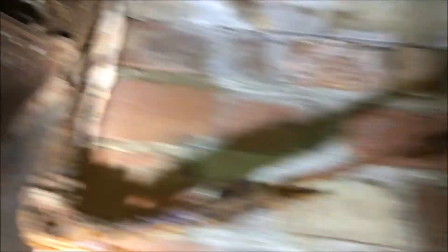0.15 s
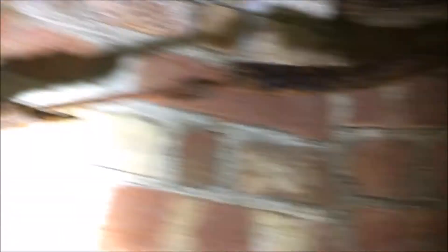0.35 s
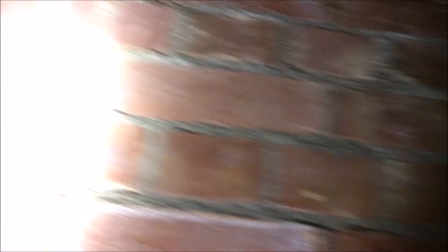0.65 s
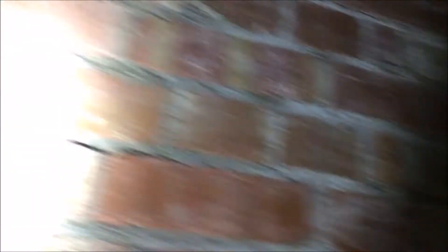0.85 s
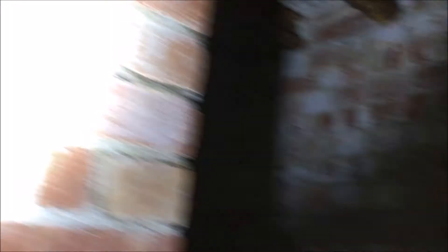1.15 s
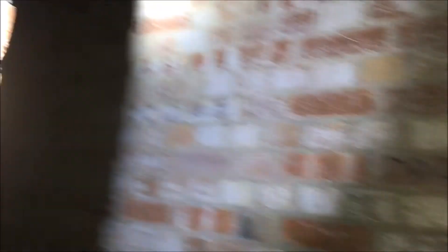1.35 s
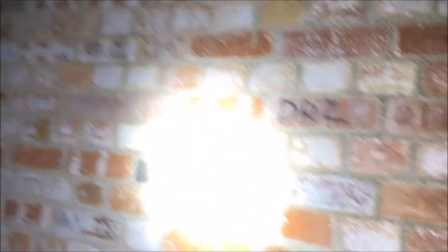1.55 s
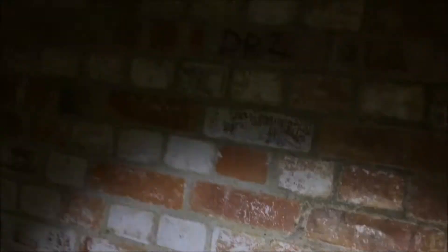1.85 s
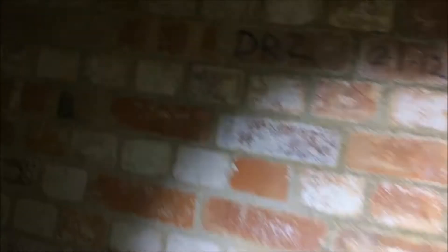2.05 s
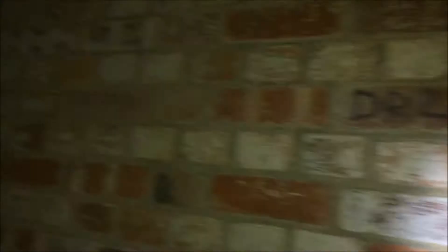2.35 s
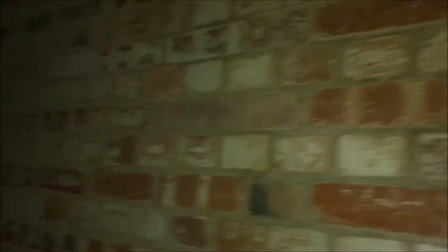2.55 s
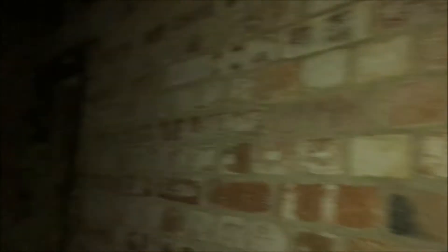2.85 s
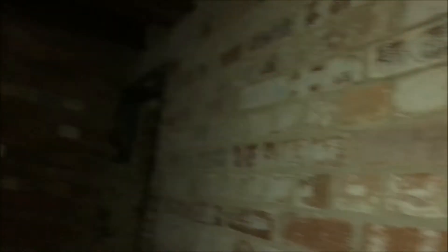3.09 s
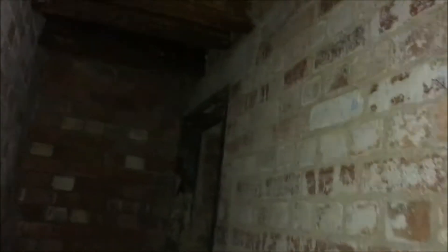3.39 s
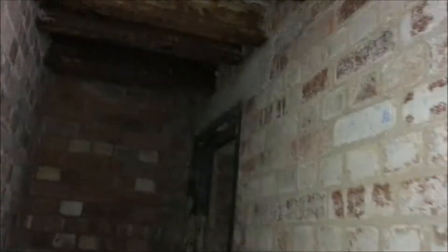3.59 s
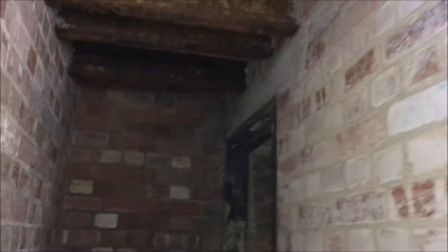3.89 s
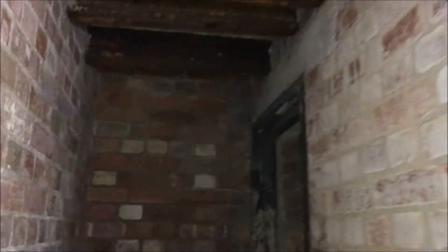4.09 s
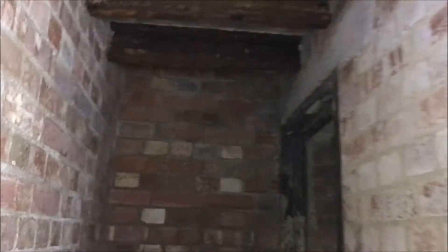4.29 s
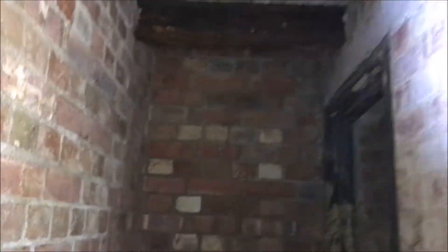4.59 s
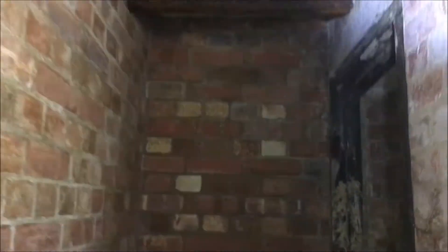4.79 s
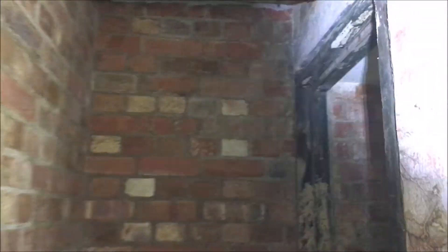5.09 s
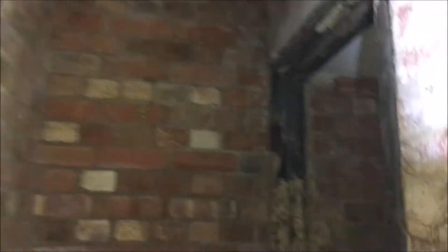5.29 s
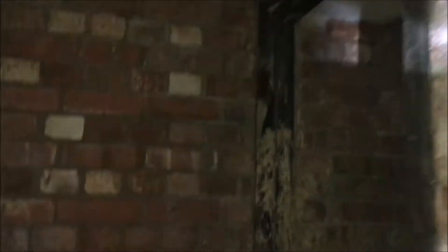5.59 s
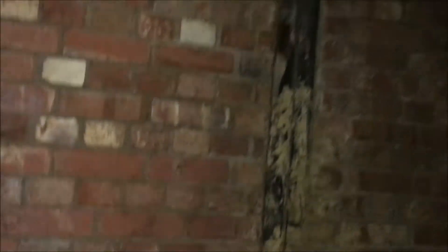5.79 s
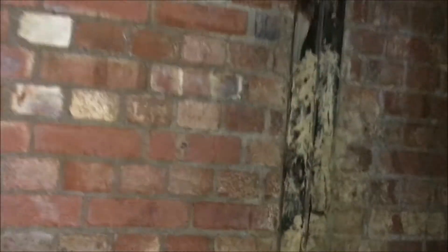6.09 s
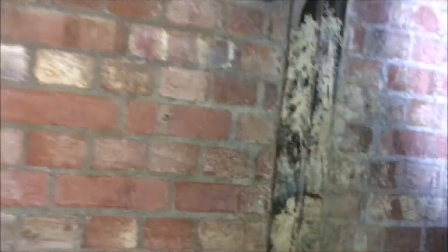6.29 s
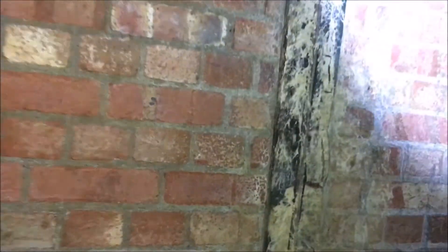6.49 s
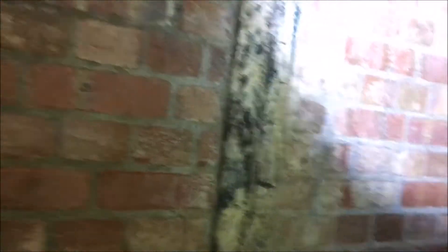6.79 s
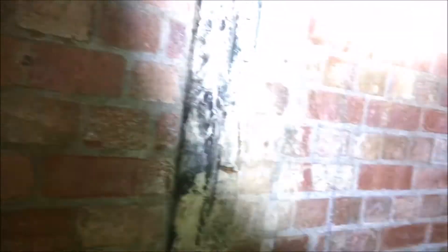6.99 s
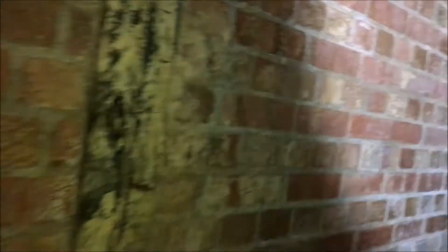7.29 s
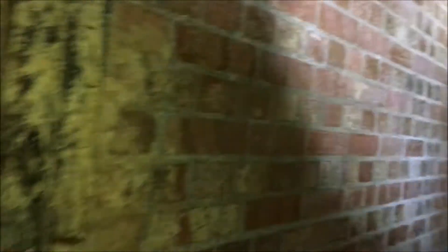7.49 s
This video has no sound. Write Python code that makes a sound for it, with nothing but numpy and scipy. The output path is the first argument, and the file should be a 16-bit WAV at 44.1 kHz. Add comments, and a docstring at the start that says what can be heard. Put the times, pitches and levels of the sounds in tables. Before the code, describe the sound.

In a small, hard-walled brick cellar, close and slightly boxy, a faint low rumble and thin hiss lie under everything. In the first half second, quick gritty steps and scuffs scatter small chips. A soft step falls near 0.85, then light hollow taps around 1.3-1.45. From 1.9 to 3.0 there are faint crumbles, soft footfalls, sandy drags and a sharper stone knock at 2.6. Gentle steps and ticks continue from 3.4, with a firm step and bright clack around 4.15-4.25. At 4.8 a heavy crunch begins the shove: a hollow piece grates and rings in stuttering pushes, crumbling grit, with the loudest hard crack at 5.3 and clinks near 5.45. It fades by about 5.7. Soft steps at 5.95, 6.7 and 7.45 follow, with light scuffs and small ticks, each leaving a short reverberant tail.

```python
"""Slow footsteps over cellar rubble

Someone walks slowly over rubble in a small brick cellar. Soles crush grit (bursts of tiny fractures)
and thud (shaped noise); loose chips knock and shards clink (damped and narrow resonances).
A hollow piece of debris is shoved along in four pushes: stick-slip grains ring its modes and grate,
while lumps crumble. Close hard walls answer with a short tail, over a faint rumble and hiss of noise.
"""
import sys
import numpy as np
from scipy import signal
from scipy.fft import rfft, irfft
from scipy.io import wavfile

SR = 44100
rng = np.random.default_rng(int(sys.argv[2]) if len(sys.argv) > 2 else 0)


def output_pcm(signal):
    """Save a mono or channel-first signal as 16-bit PCM at the path in sys.argv[1].

    Samples are clipped to [-1, 1] before scaling.
    """
    pcm = np.clip(np.atleast_2d(signal).T, -1, 1) * 32767
    wavfile.write(sys.argv[1], SR, np.round(pcm).astype(np.int16))


N = 337365
TIME = np.arange(N) / SR

# Footfalls. Each row: start in seconds, time to bear down in seconds, relative weight in dB,
# thud pitch in Hz, relative level of crushed grit in dB, grit pitch in Hz, relative sandy treble in dB.
FOOTFALLS = [(.005,0.1,-49.5,174,-57,1800,-59), (.089,0.025,-42.5,138,-37,2470,-41.5),
             (.217,0.027,-50.5,180,-44,2000,-49.5), (0.852,0.04,-56,150,-43,1330,-57.5),
             (2.282,0.043,-56.5,172,-47,1940,-51), (2.833,0.048,-49,135,-45,2530,-49.5),
             (3.454,0.06,-55.5,185,-46,1800,-59), (3.727,0.056,-60,198,-49,1040,-48.5),
             (4.152,0.049,-39.5,177,-43,1940,-38), (4.806,0.03,-43.5,168,-29.5,1804,-25),
             (5.086,.05,-41,138,-28,1910,-26), (5.932,0.03,-45.5,165,-43.5,1484,-47),
             (5.988,0.031,-45.5,149,-55.5,1400,-53), (6.684,.024,-49,164,-39,2930,-46),
             (7.436,0.031,-55.5,171,-58,2210,-57.5)]
# Soles dragging lightly over grit. Each row: start in seconds, length in seconds,
# relative level in dB, rub pitch in Hz.
SOLE_DRAGS = [(0.013,.095,-45,1770), (0.101,0.057,-48.5,814), (0.335,0.072,-48.5,1250),
              (0.452,0.18,-60,930), (0.675,0.23,-62,1320), (0.994,.07,-61,1260), (2.009,0.065,-53.5,1170),
              (2.154,0.26,-56,2060), (2.421,0.4,-63,2050), (2.695,0.065,-56,2380), (2.864,0.089,-50.5,1640),
              (2.956,0.097,-57.5,2150), (3.204,0.17,-57,1010), (3.658,0.068,-52.5,1740),
              (4.317,.16,-52.5,1890), (4.581,0.3,-62,2050), (6.13,.18,-52,1337), (6.606,.045,-58.5,1190),
              (6.749,0.084,-55.5,1920), (6.824,0.15,-51.5,2390), (7.51,0.11,-57.5,2000)]
# Spectrum of sand. Each row: frequency in Hz, relative density in dB per Hz.
SAND_SPECTRUM = [(500, -52.5), (2500, -6), (3800, 0), (4900, -5.5), (6200, 2.5), (7800, -2.5),
                 (11000, -2.5), (15500, -3)]


def undb(db):
    """Decibels to gain."""
    return 10 ** (np.asarray(db) / 20)


def unit(x):
    """Scale to an rms of one."""
    return x / np.sqrt(np.mean(x ** 2) + 1e-20)


def held(x, length_s, db):
    """Give a burst the energy of a level held for a length of time."""
    return x * undb(db) * np.sqrt(length_s * SR / (np.sum(x ** 2) + 1e-20))


def add(track, s, sound):
    """Mix a sound in at a time in seconds."""
    start = max(int(s * SR), 0)
    track[start:start + len(sound)] += sound[:max(N - start, 0)]


def colour(x, points, size=2048):
    """Causal minimum-phase filter with a (Hz, dB) spectrum that keeps the power of white noise."""
    hz, db = np.transpose(points)
    grid = np.maximum(np.fft.rfftfreq(size, 1 / SR), 1)
    magnitude = undb(np.interp(np.log(grid), np.log(hz), db))
    # folding the cepstrum forward in time makes the filter causal
    cepstrum = irfft(np.log(magnitude))
    cepstrum[1:size // 2] *= 2
    cepstrum[size // 2 + 1:] = 0
    response = irfft(np.exp(rfft(cepstrum)))
    return signal.fftconvolve(x, response / np.linalg.norm(response))[:len(x)]


def resonate(x, hz, width_hz):
    """One resonance, gain 1 at its centre."""
    return signal.lfilter(*signal.iirpeak(hz, hz / min(width_hz, SR / 4), fs=SR), x)


def grains(count, per_s, spread_db):
    """Tiny fractures at random moments: many small, a few large."""
    happens, rank, sign = rng.random((3, count))
    size = undb(-spread_db * np.log(.01 + rank))
    return unit((happens < per_s / SR) * size * np.sign(sign - .5))


def catching(rate, depth_db):
    """The uneven grip of a sliding contact: a gain that wanders at a rate in Hz, with an rms of one."""
    count = int(N / SR * rate) + 2
    wander = np.interp(TIME * rate, np.arange(count), rng.standard_normal(count))
    return unit(undb(depth_db * wander))


def lump(x, hz, breadth, low_db=-11, low_ratio=0.61):
    """A stone's ring (breadth: filter width over pitch), with a duller answer from the rubble under it."""
    ring = resonate(resonate(x, hz, breadth * hz), hz, breadth * hz)
    low_hz = low_ratio * hz
    bed = resonate(resonate(x, low_hz, low_hz), low_hz, low_hz)
    return ring + breadth * undb(low_db) * bed


def pebbles(load, hz, per_s, scatter=.45, breadth=0.11, count=12):
    """Stones of mixed sizes chatter under a load, each ringing at its own pitch."""
    spread = np.linspace(-2, 2, count)
    pitches = np.clip(hz * np.exp(scatter * (spread + rng.normal(0, .15, count))), 200, 9000)
    shares = np.exp(-spread ** 2 / 4)
    chatter = np.zeros(len(load))
    for pitch, share in zip(pitches, shares):
        knocks = grains(len(load), per_s, 2.6) * load
        chatter += share * resonate(knocks, pitch, breadth * pitch) / np.sqrt(pitch)
    return chatter


def bounced(sound, scatter=.35):
    """A sound with first echoes off floor and nearest bricks, their delays scattered from spot to spot."""
    # Each row: typical delay in seconds, level against the direct sound in dB.
    first_echoes = [(.0018,-9), (.0055,-12)]
    out = sound.copy()
    for delay_s, db in first_echoes:
        lag = max(int(delay_s * SR * np.exp(scatter * rng.uniform(-1, 1))), 1)
        out[lag:] += undb(db) * sound[:-lag]
    # the echoes change the tone but not the overall level
    return out * np.std(sound) / (np.std(out) + 1e-20)


def diffuse(count, size=512):
    """Crowded echoes evened out towards the same energy at every pitch and moment."""
    echoes = grains(count, 9000, 1.8)
    for _ in range(2):
        frames = signal.stft(echoes, nperseg=size)[2]
        echoes = signal.istft(frames / (np.abs(frames) + 1e-12), nperseg=size)[1][:count]
    return echoes


def cellar(x, wet_db, first_s=0.006, build_s=0.00067, near=0.62, near_s=0.024):
    """Direct sound, a quick flurry from the nearest walls, then a tail whose treble dies before its lows."""
    # Reverberation by band. Each row: frequency in Hz, time to fall 60 dB in seconds,
    # energy in dB before the wet level is added.
    bands = [(90, 0.59, -6), (220, 1, 3), (600, 0.58, 0), (1310, .38, -7.5), (3055, 0.29, -5.5),
             (5960, 0.33, -8.5), (13000, 0.26, -8.5)]
    t = TIME[:SR * 3 // 4]
    hz, t60, db = np.transpose(bands)
    grid = np.log(np.maximum(np.fft.rfftfreq(2 * len(t), 1 / SR), 1))
    echoes = rfft(diffuse(2 * len(t)))
    echo_level = np.std(irfft(echoes))
    build_up = 1 - np.exp(-np.maximum(t - first_s, 0) / build_s)
    onset = build_up * (1 + near * np.exp(-t / near_s))
    response = np.zeros(len(t))
    # each row of the identity matrix picks out one band
    for share, decay_s, band_db in zip(np.eye(len(hz)), t60, db):
        band = irfft(echoes * np.interp(grid, np.log(hz), share))[:len(t)] / echo_level
        decay = np.exp(-np.log(1000) * t / decay_s)
        response += band * held(onset * decay, 1 / SR, band_db + wet_db)
    return x + signal.fftconvolve(x, response)[:N]


def still_air(rumble_db=-3.0, hiss_db=-61.5):
    """Shaped noise: a low rumble that comes and goes, and a faint even hiss."""
    # Swell of the rumble. Each row: time in seconds, relative level in dB.
    swell = [(0,-56), (.45,-57), (.82,-50), (1.5,-59.5), (2.9,-53.5), (3.8,-56.5), (5.2,-51), (7.65,-52)]
    # Spectrum of the rumble. Each row: frequency in Hz, relative density in dB per Hz.
    rumble_spectrum = [(12,-30.5), (25,-16), (42,2), (60,1), (85,-7), (120,-29.5), (250,-34.5),
                       (1000,-73.5)]
    # Spectrum of the still air. Each row: frequency in Hz, relative density in dB per Hz.
    air_spectrum = [(20,-11.5), (60,-10.5), (120,-2), (213,0.5), (324,-7), (686,-12), (1540,-14),
                    (3540,-16), (4810,-20), (8000,-20), (15500,-17.5)]
    s, db = np.transpose(swell)
    rumble = undb(np.interp(TIME, s, db)) * unit(colour(rng.standard_normal(N), rumble_spectrum, size=8192))
    hiss = unit(colour(rng.standard_normal(N), air_spectrum))
    return undb(rumble_db) * rumble + undb(hiss_db) * hiss


def settling(swell_s=0.058, body_db=-65, hz=1600, breadth=1.5, tick_db=-73):
    """Small grit keeps shifting and rustling for a while after each footfall and scuff begins."""
    stir, t = np.zeros(N), TIME[:SR] / swell_s
    for s, *_ in FOOTFALLS + SOLE_DRAGS:
        add(stir, s, t * np.exp(-t))
    ticks = grains(N, 350, 1.8) * stir
    body = unit(lump(ticks, hz, breadth))
    return undb(body_db) * body + undb(tick_db) * unit(colour(ticks, SAND_SPECTRUM))


def drag(length, db, hz, rub_db=-5, stones_db=-4, sand_db=-4, breadth=1.46, edge=0.64, grip_db=2.5):
    """A dragged sole swells, catches and fades, rolling small stones and sand under it."""
    t = TIME[:int(1.2 * length * SR)]
    grip = undb(grip_db * np.interp(t * 70, np.arange(32), rng.standard_normal(32)))
    load = signal.windows.tukey(len(t), edge) * grip
    rub = lump(grains(len(t), 2200, 2) * load, hz, breadth)
    sand = colour(grains(len(t), 2000, 2.3) * load, SAND_SPECTRUM)
    stones = pebbles(load, hz, 80)
    # a higher, sharper rub drags more sand along: 14.5 dB per octave around 2050 Hz
    sandy_db = sand_db + 14.5 * np.log2(hz / 2050)
    rubbing = held(rub, length, db + rub_db) + held(stones, length, db + stones_db)
    return rubbing + held(sand, length, db + sandy_db)


def scuffs():
    """The feet shuffle lightly over grit."""
    out = np.zeros(N)
    for s, length, db, hz in SOLE_DRAGS:
        add(out, s, bounced(drag(length, db, hz)))
    return out


def taps(contact_s=0.006, breadth=0.19, rattle_s=0.013, edge_hz=1750, edge_db=-9):
    """Hollow things are nudged: light taps, then a low boom from the shoved piece; each ring has a click."""
    # Each row: start in seconds, ring level in dB, ring pitch in Hz.
    nudges = [(1.271,-45.5,830), (1.3474,-52,930), (1.4357,-55,870), (4.83,-35,297)]
    out, t = np.zeros(N), TIME[:SR // 12]
    for s, db, hz in nudges:
        blow = grains(len(t), 4000, 0.69) * np.exp(-t / rattle_s)
        ring = resonate(resonate(blow, hz, breadth * hz), hz, 2 * hz)
        click = lump(blow, edge_hz, 1.0)
        add(out, s, held(ring, contact_s, db) + held(click, contact_s, db + edge_db))
    return out


def strike(db, hz, breadth, tick_db, contact_s=0.0042, rock_s=.006, first_db=-5,
           grit_s=0.0034, grit_db=-15, body_db=-1, bright_db=-1):
    """Grit gives way under a stone for a fiftieth of a second; it then hits the floor and rocks briefly."""
    lead = SR // 50
    t = TIME[:SR // 12] - lead / SR
    giving_way = undb(grit_db) * np.exp(-np.abs(t) / grit_s)
    rocking = np.exp(-np.abs(t) / rock_s)
    load = np.where(t < 0, giving_way, rocking)
    blow = held(grains(len(t), 3000, 2.6) * load, 1 / SR, 0)
    blow[lead] += undb(first_db)
    body = held(lump(blow, hz, breadth), contact_s, db + body_db)
    return body + held(colour(blow, SAND_SPECTRUM), contact_s, tick_db + bright_db)


def loose_stones(chip_breadth=1, shard_breadth=0.04, shard_tick_db=-18.5):
    """Chips, too damped to ring, knock dully; hard shards resonate narrowly and clink."""
    # Chips. Each row: time of impact in seconds, relative body level in dB, body pitch in Hz,
    # relative bright tick in dB.
    chips = [(0.0488,-44,1820,-48), (.129,-31.5,2390,-39), (.141,-39.5,660,-57), (0.2498,-60,2040,-35.5),
             (.3055,-84,2010,-41.5), (0.5599,-42.5,1220,-55), (0.857,-61,1500,-52), (1.0085,-50.5,1650,-56),
             (1.129,-60,2370,-73), (1.8802,-40,1970,-46.5), (2.0609,-37.5,2100,-38.5),
             (2.1947,-47.5,2350,-40), (2.295,-38,2400,-34), (2.6124,-25,2100,-31), (2.6173,-38.5,1230,-40),
             (2.7622,-43,1260,-46), (3.525,-33.5,2020,-43.5), (3.6066,-33,2110,-43), (4.246,-21,1900,-70),
             (4.2547,-26.5,1950,-32.5), (5.2975,-19,2320,-12), (5.3172,-14.5,1770,-15),
             (5.428,-32,2600,-50), (6.697,-39,2770,-37.5), (6.704,-46.5,514,-55), (6.924,-42.5,2810,-57),
             (7.3084,-53.5,2400,-70), (7.45,-50,2900,-45), (7.526,-43.5,2170,-51)]
    # Shards. Each row: time of impact in seconds, relative level in dB, pitch in Hz.
    shards = [(2.062,-42,4430), (2.2448,-47,3460), (3.005,-45.5,2470), (4.834,-23,1530), (5.27,-27.5,1364),
              (5.43,-25.5,2550), (5.437,-26,2594), (5.463,-29,2150)]
    out = np.zeros(N)
    lead_s = 1 / 50  # each strike starts with its giving grit
    for s, db, hz, tick_db in chips:
        add(out, s - lead_s, bounced(strike(db, hz, chip_breadth, tick_db)))
    for s, db, hz in shards:
        add(out, s - lead_s, strike(db, hz, shard_breadth, db + shard_tick_db))
    return out


def crush(length, db, hz, treble_db, release_s=0.0063, breadth=1.46, body_db=-4.0, sand_db=-1,
          first_share=0.48):
    """A burst of fractures that swells while the weight bears down, then dies away."""
    t = TIME[:SR // 6]
    swell = np.interp(t, [0, length / 2], [first_share, 1])
    load = swell * np.exp(-np.maximum(t - 0.76 * length, 0) / release_s)
    body = lump(grains(len(t), 3500, 3) * load, hz, breadth)
    sand = colour(grains(len(t), 7000, 2.3) * load, SAND_SPECTRUM)
    return held(body, length, db + body_db) + held(sand, length, treble_db + sand_db)


def crunches(hz=2240):
    """Lumps crumble under a sole or under the shoved piece, all at one pitch."""
    # Each row: start in seconds, length in seconds, relative body level in dB, relative sandy treble in dB.
    crumbling = [(0.125,0.013,-37,-39), (1.862,0.037,-52.5,-60), (2.041,0.055,-45,-55),
                 (3.513,0.012,-43,-66), (3.61,0.054,-42.5,-60.5), (3.944,0.04,-48.5,-60),
                 (4.877,.026,-25.5,-25), (4.931,0.022,-21.5,-22.5), (5,0.035,-30,-31.5),
                 (5.045,0.023,-40,-33), (5.099,0.016,-23.5,-18.5), (5.27,0.021,-34,-34.5),
                 (5.296,0.018,-9,-15), (5.425,0.025,-25.5,-29), (6.019,.045,-44.5,-48)]
    out = np.zeros(N)
    for s, length, db, sand_db in crumbling:
        add(out, s, crush(length, db, hz, sand_db))
    return out


def thud(length, db, hz, rise_s=0.0016, release_s=0.017, weight_db=-2):
    """A soft sole pushes on the rubble: a dull thud of noise as long as the weight comes down."""
    # Spectrum of a heavy sole thudding at 177 Hz. Each row: frequency in Hz, relative density in dB per Hz.
    sole_spectrum = [(30,-17), (60,-8.5), (90,-0.5), (125,-4.5), (160,0.5), (215,2), (260,-10), (305,-8),
                     (370,-17), (460,-8.5), (700,-20), (2000,-52.5)]
    t = TIME[:SR // 4]
    load = (1 - np.exp(-t / rise_s)) * np.exp(-np.maximum(t - length, 0) / release_s)
    shifted = [(f * hz / 177, level) for f, level in sole_spectrum]
    return held(colour(rng.standard_normal(len(t)) * load, shifted), length, db + weight_db)


def steps(weight_lag_s=0.00783, weight_linger_s=0.017, roll_s=.11, roll_db=-16.5, roll_pitch=.7):
    """Each footfall crushes grit, thuds as the weight arrives, and rolls on with a softer, lower rub."""
    out = np.zeros(N)
    for s, length, weight_db, thud_hz, grit_db, hz, sand_db in FOOTFALLS:
        add(out, s, bounced(crush(length, grit_db, hz, sand_db)))
        # the weight arrives after the first grit breaks, and outlasts it
        add(out, s + weight_lag_s, thud(length + weight_linger_s, weight_db, thud_hz))
        add(out, s + length, bounced(drag(roll_s, grit_db + roll_db, roll_pitch * hz)))
    return out


def push_force(attack_s=0.016, release_s=.035):
    """Each push builds quickly, eases off while the piece slides, and lets go."""
    # Each row: start in seconds, length in seconds, force in dB, easing off in dB per second.
    pushes = [(4.806,.28,0.5,12.5), (5.083,.11,-0.5,50.5), (5.286,0.33,6,129), (5.496,0.14,-9.5,57.5)]
    force, t = np.zeros(N), TIME[:SR]
    for s, length, db, easing in pushes:
        shape = np.minimum(t / attack_s, 1) * np.exp(-np.maximum(t - length, 0) / release_s)
        add(force, s, shape * undb(db - easing * t))
    return force


def shove(ring_db=-28.5, highpass_hz=600, rasp_db=-31, stones_db=-33, stones_hz=2000, sand_db=-34,
          cracks_db=-38, crack_sand_db=-3):
    """The hollow piece sticks and slips on concrete; the shifting contact favours one mode, then another."""
    # Modes of the hollow piece. Each row: frequency in Hz, width in Hz, relative level in dB
    # before the high-pass.
    modes = [(502.3,12,-1), (635.6,43,0.5), (675.5,22,-0.5), (1005,28,2.5), (1096,40,3), (1290,23,7.5),
             (1394,19,-1), (1573,21,1), (1650,36,-9), (1805,34,-12), (1881,34,-9.5), (2015,35,-9),
             (2130,45,-9.5)]
    # Spectrum of rasping stone. Each row: frequency in Hz, relative density in dB per Hz.
    rasp_spectrum = [(100, -24.5), (400, -16.5), (650, -8), (830, -10), (1100, 7.5), (1500, 0.5), (2300, 1),
                     (3800, -10), (4900, -20), (7000, -36), (15000, -29)]
    force = push_force()
    # the ring grows in step with the force, rasp and sand grow faster
    rasp, sand = force ** 2.6, force ** 2
    grip = catching(70, 2.6)
    slips = grains(N, 2500, 3.8) * grip
    ringing = np.zeros(N)
    for hz, width, db in modes:
        ringing += undb(db) * resonate(slips * catching(22, 2), hz, width)
    # a high-pass thins the ring below 600 Hz
    ringing = signal.sosfilt(signal.butter(3, highpass_hz, "high", fs=SR, output="sos"), ringing)
    rasping = colour(grains(N, 1500, 2.6) * grip * rasp, rasp_spectrum)
    stones = unit(pebbles(grip, stones_hz, 100)) * rasp
    sanding = colour(grains(N, 4100, 3.5) * grip * sand, SAND_SPECTRUM)
    # coarse grains burst one by one under the edge
    bursts = grains(N, 90, 1.6) * sand
    cracks = colour(bursts, rasp_spectrum) + undb(crack_sand_db) * colour(bursts, SAND_SPECTRUM)
    grit = undb(stones_db) * stones + undb(sand_db) * sanding + undb(cracks_db) * cracks
    return undb(ring_db) * unit(ringing) * force + undb(rasp_db) * rasping + grit


def scene():
    """Feet and debris over still air; each kind of source meets the walls from its own spot."""
    shuffling = cellar(scuffs() + settling(), wet_db=-1.9)
    feet = cellar(crunches(), wet_db=1.26) + cellar(steps(), wet_db=0.23) + shuffling
    small_debris = cellar(loose_stones(), wet_db=3.0) + cellar(taps(), wet_db=-2.0)
    debris = small_debris + cellar(shove(), wet_db=-0.5)
    return (feet + debris + still_air())[None]


def record(dry, top_hz=15900):
    """Soft saturation rounds the highest peaks, then a steep low-pass cuts the top."""
    low_pass = signal.ellip(10, .2, 80, top_hz, fs=SR, output="sos")
    return signal.sosfilt(low_pass, np.tanh(dry))


dry = scene()
out = record(dry)
output_pcm(out)
```